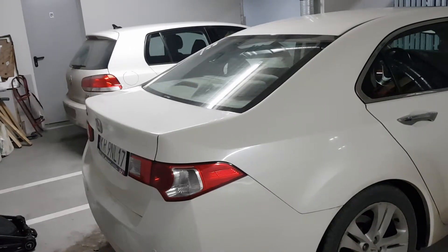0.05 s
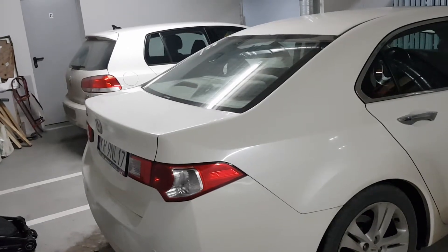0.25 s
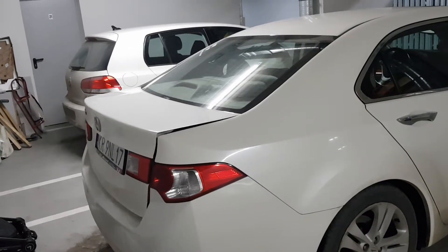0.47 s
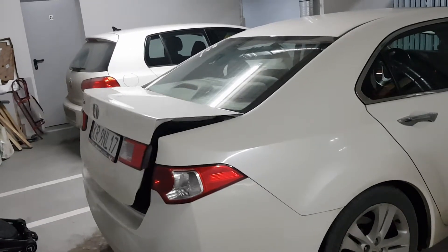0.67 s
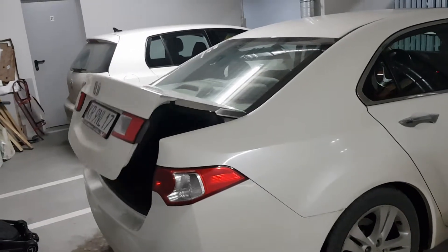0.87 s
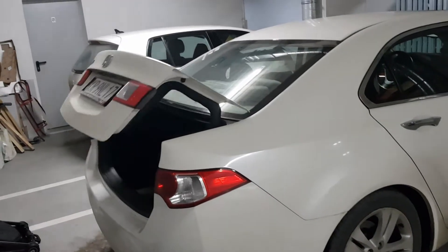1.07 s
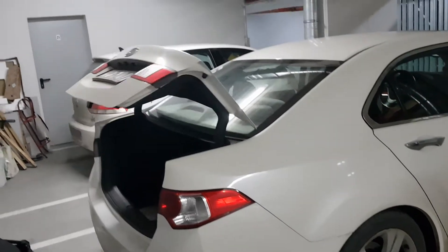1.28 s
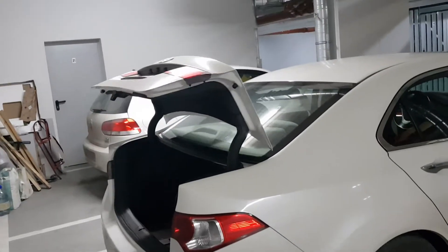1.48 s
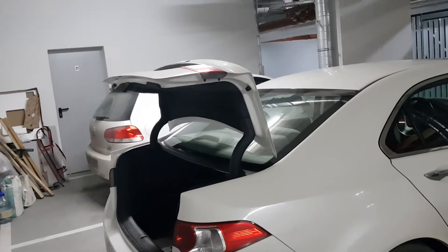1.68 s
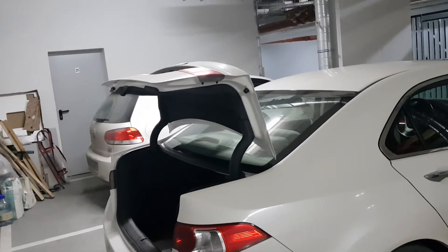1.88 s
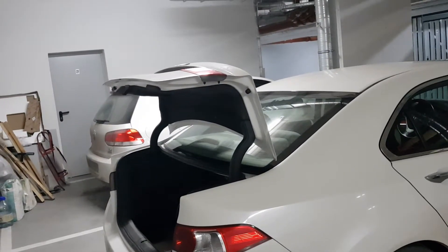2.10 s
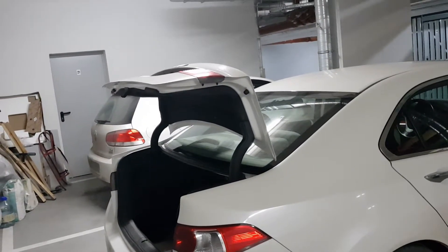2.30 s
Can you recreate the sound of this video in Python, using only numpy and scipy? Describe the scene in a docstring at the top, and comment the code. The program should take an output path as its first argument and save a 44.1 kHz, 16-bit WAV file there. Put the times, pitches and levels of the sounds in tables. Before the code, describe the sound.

A car trunk opens with a brief motor whirr, a thud and sharp clicks. The lid rises on faintly rubbing hinges and knocks against its stop, close by and slightly left, in a concrete garage with rumbling ventilation.

```python
"""Ventilation rumbles in a quiet concrete garage; then a car's trunk opens, a little left of the microphone.
The release motor whirrs, the latch lets go with a thud that rings the body, the lid clacks free
and a sharp click sounds close by. The lid swings up on rubbing hinges, knocks against its stop
and rebounds with a boom of sheet metal. A few soft steps follow; the concrete adds a short tail."""
import sys
import numpy as np
from scipy import signal
from scipy.io import wavfile

SR = 44100
rng = np.random.default_rng(int(sys.argv[2]) if len(sys.argv) > 2 else 0)


def transcribe(signal):
    """Save signal, clipped to [-1, 1], as a 16-bit WAV file at the path in sys.argv[1]."""
    frames = np.atleast_2d(signal).T
    limited = np.clip(frames, -1, 1)
    pcm = np.round(limited * 32767).astype(np.int16)
    wavfile.write(sys.argv[1], SR, pcm)


N = 108045
T = np.arange(N) / SR

# Colour of each struck part, and of the bright treble hiss: frequency_hz, relative_density_db
PAWL_COLOUR = [(500, -10.5), (900, 1.5), (1500, 2.5), (2100, 1), (3600, -5.5), (4800, -19), (8000, -28),
               (15000, -26)]
LATCH_COLOUR = [(35, -8.5), (100, -3), (240, 0.5), (300, -5.5), (600, -9), (1150, -13), (1400, -12),
                (2200, -10.5), (3400, -21.5), (8000, -34), (15000, -36.5)]
TREBLE_HISS_COLOUR = [(4000, -2.5), (8000, -8.5), (10500, 0.5), (15000, -3)]
CATCH_COLOUR = [(200, -31.5), (320, -8.5), (437, -24.5), (606, -16), (900, -19), (1470, -25.5),
                (3500, -26.5), (6300, -43.5), (15000, -40.5)]
STOP_COLOUR = [(400, -11.5), (640, 0), (800, -2), (1430, -8), (1950, -3), (2440, -11.5), (5280, -20),
               (7800, -32), (10000, -24.5), (15000, -37)]
REBOUND_COLOUR = [(240, -6.5), (400, 1), (550, -7), (1370, -4), (1910, -2), (4590, -8.5), (7720, -27),
                  (14000, -20)]
THUMP_COLOUR = [(120, -4.5), (250, 2), (450, -7), (800, -6), (1500, -21.5), (2200, -22), (3500, -23)]
# Blows that set them going: start_s, level_db, attack_s, t60_at_1khz_s
PAWL_HITS = [(.333, -58, 0.0046, 0.074), (.354, -50.5, .003, 0.18), (0.43, -38, 0.0029, 0.025),
             (0.4391, -30.5, 0.0007, 0.06), (0.581, -32, 0.0014, 0.06)]
LATCH_HITS = [(.431, -28.5, 0.0055, 0.15), (.451, -30, 0.0042, 0.24)]
TREBLE_HISS_HITS = [(0.449, -52, 0.0026, 0.67), (0.582, -39.5, .001, .025), (0.584, -57, .003, 0.36)]
CATCH_HITS = [(.582, -37.5, .003, .22)]
STOP_HITS = [(1.514, -44, 0.0037, 0.15), (1.519, -36, 0.0011, 0.32)]
REBOUND_HITS = [(1.749, -50, 0.004, 0.27)]
LID_THUMPS = [(1.231, -53.5, 0.0071, 0.47), (1.524, -45.5, 0.0164, 0.25)]
STEP_HITS = [(2.105, -57.5, 0.0046, 0.37), (2.195, -63.5, 0.0049, 0.17), (2.354, -59, 0.01955, 0.21)]
# Modes of the car body, freed lid, hinge arms and the lid's sheet metal: pitch_hz, level_db, t60_s
BODY_MODES = [(68.5, -24.5, .42), (126, -25, .25), (206, -25.5, .24), (332, -33.5, 0.3), (447, -43, .2),
              (562, -42, 0.17), (2210, -38, 0.083)]
LID_MODES = [(238.5, -29, 0.11), (633, -46.5, 0.14)]
ARM_MODES = [(542.6, -47.5, 0.36), (642.2, -41, 0.25), (757, -45, 0.21), (1174, -56, 0.41),
             (1243, -50.5, 0.31), (1900, -53.5, 0.33)]
SHEET_MODES = [(142.6, -49.5, 0.79), (268.7, -56, 0.27)]

# Impulses behind the sharp clicks and the faint ticks of the hinge springs: start_s, force_db
CLICK_TAPS = [(0.5847, -22.5), (0.6594, 0)]
SPRING_TAPS = [(.693, -18.5), (1.305, -26), (1.452, -24.5), (2.159, -32)]
# Resonances of the clicks: pitch_hz, width_hz, left_db, right_db
CLICK_RINGS = [(1105, 590, 5, 5.5), (2078, 411, 17, 15.5), (2650, 743, 9, 6.5), (3675, 848, 15, 8.5),
               (6590, 3300, -11.5, -0.5), (8800, 1469, 13, -9.5), (9930, 2100, 6.5, -1),
               (11600, 2900, 2, 3), (15200, 1000, -7, -14)]
# Colour of the loud click coming back off the walls: frequency_hz, relative_density_db
SCATTER_COLOUR = [(800, -13.5), (2200, -2), (3800, -0.5), (6500, -5.5), (8000, -11.5), (10000, -4.5),
                  (15000, -15.5)]
# Those early reflections: start_s, level_db, attack_s, t60_at_1khz_s
SCATTER_HITS = [(.661, -50.5, .002, 0.6)]

# Colour of the moving parts: frequency_hz, relative_density_db
MOTOR_COLOUR = [(190, 0.5), (400, -5), (600, -8), (1090, -10), (1620, -6.5), (2870, -18.5), (4300, -25),
                (5440, -31), (8200, -33.5), (10000, -24), (15000, -30.5)]
SWISH_COLOUR = [(3200, -10), (4300, 8), (6000, -6), (8000, -13), (14000, -5.5)]
HINGE_COLOUR = [(240, -26), (400, -3), (804, 2), (1370, -4), (1570, -14), (1910, -8), (5190, -4.5),
                (6510, -9), (7930, -16), (9960, -4.5), (15000, -16)]
# Envelope of each movement: attack_s, release_t60_s, level_db
MOTOR_RUN = (0.0065, .25, -48.5)
SWISH_RUN = (0.034, 0.42, -65.5)
HINGE_RUN = (0.048, 0.15, -62.5)
# When each part moves: start_s, end_s
MOTOR_SPAN, SWISH_SPAN, HINGE_SPAN = (.331, .425), (.855, .915), (1.224, 1.505)
# Whines of the motor: pitch_hz, width_hz, attack_s, level_db
MOTOR_WHINES = [(1645, 140, .006, -62), (3760, 280, .07, -63.5), (6900, 200, 0.039, -71.5)]
# Thin resonances of the rubbing hinges: pitch_hz, width_hz, level_db
HINGE_RINGS = [(6620, 420, -76), (1580, 130, -75.5), (776, 75, -72.5)]

# Colour of the garage's reverberation and of the ventilation: frequency_hz, relative_density_db
ROOM_COLOUR = [(60, -5), (300, -6), (1000, -10), (3000, 3.5), (6000, 5.5), (9000, -1), (15000, -11)]
AIR_COLOUR = [(25, -13.5), (50, -4), (95, -12.5), (120, -13.5), (200, -18.5), (310, -28), (500, -42.5),
              (1100, -48), (2600, -45.5), (5500, -55), (6800, -54.5), (7400, -67), (8400, -71),
              (12000, -42.5), (16000, -48)]
# Low standing waves that the ventilation keeps ringing: pitch_hz, width_hz, level_db
STANDING_WAVES = [(67.3, 14, -50.5), (84.5, 15, -49)]
# Likeness of diffuse sound on the two sides of the microphone: frequency_hz, correlation
STEREO_LIKENESS = [(60, 1), (300, 0.87), (700, 0.33), (1400, -0.06), (4000, -.1), (12000, -0.098)]


def latch():
    """The steel pawl clacks, the latch lets go with a thud, and the lid clacks off the catch."""
    release = blows(PAWL_COLOUR, PAWL_HITS) + blows(LATCH_COLOUR, LATCH_HITS)
    # the seal unsticking, then the catch's sharp click and high ring
    treble_hiss = blows(TREBLE_HISS_COLOUR, TREBLE_HISS_HITS)
    return release + treble_hiss + blows(CATCH_COLOUR, CATCH_HITS)


def panels():
    """The body rings at the latch; the lid's note sinks as its strain goes, and it booms on the rebound."""
    body = modes(BODY_MODES, start_s=.4345)
    freed_lid = modes(LID_MODES, start_s=.5915, sharp_share=.43)
    return body + freed_lid + modes(SHEET_MODES, start_s=1.757)


def clicks():
    """Hard contacts ring briefly near the microphone, springs tick, the loud click scatters off walls."""
    chatter = [(start_s + .0007, db - 14.5) for start_s, db in CLICK_TAPS]   # each contact bounces once
    force = taps(CLICK_TAPS) + taps(chatter)
    snaps = sum((-1) ** k * from_db([[left_db], [right_db]]) * resonate_twice(force, hz, width_hz)
                for k, (hz, width_hz, left_db, right_db) in enumerate(CLICK_RINGS))
    spring_ticks = resonate_twice(taps(SPRING_TAPS), hz=4110, width_hz=2200)
    return snaps + spring_ticks + blows(SCATTER_COLOUR, SCATTER_HITS)


def release_motor(tooth_hz=176, roughness=.4, sag_db_per_s=50.5, spin_up_s=.032):
    """Whining gears brighten as the motor spins up, pulse at the tooth rate and sag under load."""
    def spin_up(t, hz):
        """The 6 kHz region takes spin_up_s to come in; higher bands take longer."""
        return np.clip((t - MOTOR_SPAN[0]) / (spin_up_s * hz / 6000), 0, 1)

    gears = gate(MOTOR_SPAN, *MOTOR_RUN) * banded_noise(MOTOR_COLOUR, spin_up)
    teeth = 1 + roughness * np.sin(2 * np.pi * tooth_hz * T)
    sag = from_db(-sag_db_per_s * (T - MOTOR_SPAN[0]))
    whines = sum(narrow_noise(hz, width_hz) * gate(MOTOR_SPAN, attack_s, t60_s=.1, db=db)
                 for hz, width_hz, attack_s, db in MOTOR_WHINES)
    return gears * teeth * sag + whines


def lid_swing():
    """The lid swishes and thumps up on rubbing hinges, hits its stop, rings the arms and rebounds."""
    swish = gate(SWISH_SPAN, *SWISH_RUN) * banded_noise(SWISH_COLOUR)
    thumps = blows(THUMP_COLOUR, LID_THUMPS)
    friction = gate(HINGE_SPAN, *HINGE_RUN) * banded_noise(HINGE_COLOUR)
    rings = sum(narrow_noise(hz, width_hz) * gate(HINGE_SPAN, *HINGE_RUN[:2], db)
                for hz, width_hz, db in HINGE_RINGS)
    stop = blows(STOP_COLOUR, STOP_HITS) + modes(ARM_MODES, start_s=1.521)
    return swish + thumps + friction + rings + stop + blows(REBOUND_COLOUR, REBOUND_HITS)


def footsteps():
    """Soft, dull footfalls on the garage floor."""
    return blows(THUMP_COLOUR, STEP_HITS)


def garage(sound):
    """Diffuse reverberation that comes back to the microphone off the concrete."""
    tail = dense_ring(ROOM_COLOUR, attack_s=.0083, t60_at_1khz_s=.59)
    tail /= np.sqrt(np.sum(tail ** 2) / 2)   # unit energy a side
    return signal.fftconvolve(sound.mean(axis=0, keepdims=True), tail, axes=1)[:, :N]


def ventilation(air_db=-53):
    """The room tone: steady air noise over throbbing low standing waves."""
    rumble = 0
    for hz, width_hz, db in STANDING_WAVES:
        wave = resonate_twice(rng.standard_normal(N + SR), hz, width_hz)[SR:]   # already ringing
        rumble += from_db(db) * rms_one(wave)
    return from_db(air_db) * banded_noise(AIR_COLOUR) + rumble


def blows(colour, hits):
    """Each blow sets the dense ring of one part going."""
    return sum(from_db(db) * placed(dense_ring(colour, attack_s, t60_s), start_s)
               for start_s, db, attack_s, t60_s in hits)


def dense_ring(colour, attack_s, t60_at_1khz_s, knee_hz=606, slope=.21):
    """Countless close modes that swell and die; above the knee, the higher the sooner."""
    def envelope(t, hz):
        t60_s = t60_at_1khz_s * (1000 / max(hz, knee_hz)) ** slope
        return np.minimum(t / attack_s, 1) * decay(t - attack_s, t60_s)

    return banded_noise(colour, envelope, size=SR)


def modes(table, start_s, sharp_share=0, settle_s=.011):
    """The strong single modes of a struck part; a strained part starts sharp and settles."""
    t = np.maximum(T - start_s, 0)
    bent_time = t + sharp_share * settle_s * (1 - np.exp(-t / settle_s))
    return -sum((-1) ** k * from_db(db) * np.sin(2 * np.pi * hz * bent_time) * decay(t, t60_s)
                for k, (hz, db, t60_s) in enumerate(table))


def taps(rows, lead_s=.00032):
    """Single impulses that reach the right side of the microphone first."""
    force = np.zeros((2, N))
    for start_s, db in rows:
        force[0, int(start_s * SR)] = force[1, int((start_s - lead_s) * SR)] = from_db(db)
    return force


def banded_noise(colour, envelope=lambda t, hz: 1, size=N):
    """Third-octave stereo noise of rms 1, each band then shaped by envelope(t, hz)."""
    edges_hz = 22 * 2 ** (np.arange(30) / 3)
    t = np.arange(size) / SR
    white = rng.standard_normal((2, 2, size + SR // 4))
    noise, power = 0, 0
    for k, (low, high) in enumerate(zip(edges_hz, edges_hz[1:])):
        if high < colour[0][0] or low > colour[-1][0]:
            continue
        hz = np.sqrt(low * high)
        band = signal.butter(2, [low, high], "band", fs=SR, output="sos")
        mid, side = rms_one(signal.sosfilt(band, white[k % 2])[:, -size:])
        likeness = at_hz(STEREO_LIKENESS, hz)
        stereo = np.sqrt(1 + likeness) * mid + np.sqrt(1 - likeness) * side * [[1], [-1]]
        gain = from_db(at_hz(colour, hz)) * np.sqrt(high - low)
        noise += gain * envelope(t, hz) * stereo
        power += 2 * gain ** 2
    return noise / np.sqrt(power)


def narrow_noise(hz, width_hz):
    """Stereo noise of rms 1 around one pitch."""
    return rms_one(resonate_twice(rng.standard_normal((2, N)), hz, width_hz))


def resonate_twice(x, hz, width_hz):
    """Twice through a two-pole resonance: gain 1 on top, dark valleys beside it."""
    radius = np.exp(-np.pi * width_hz / SR)
    feedforward = np.array([1, 0, -1]) * (1 - radius ** 2) / 2
    feedback = [1, -2 * radius * np.cos(2 * np.pi * hz / SR), radius ** 2]
    for _ in range(2):
        x = signal.lfilter(feedforward, feedback, x + 1e-18)
    return x


def gate(span, attack_s, t60_s, db):
    """Attack, hold and release of a movement."""
    start_s, end_s = span
    return from_db(db) * np.clip((T - start_s) / attack_s, 0, 1) * decay(T - end_s, t60_s)


def decay(t, t60_s):
    """Exponential decay from t = 0."""
    return np.exp(-np.log(1000) * np.maximum(t, 0) / t60_s)


def placed(x, start_s):
    """A sound set into the timeline at its start."""
    return np.pad(x, ((0, 0), (int(start_s * SR), N)))[:, :N]


def to_left(x, db):
    """Raise the left side and lower the right, each by db."""
    return x * from_db([[db], [-db]])


def at_hz(table, hz):
    """Read a table on a log-frequency axis."""
    frequencies, values = np.array(table).T
    return np.interp(np.log(hz), np.log(frequencies), values)


def from_db(db):
    """Decibels to gain."""
    return 10 ** (np.asarray(db) / 20)


def rms_one(x):
    """Scale to unit rms."""
    return x / np.sqrt(np.mean(x ** 2) + 1e-20)


def scene(reverb_db=-8.5):
    """Trunk and steps a little left of the microphone, the panels' modes centred, the garage all round."""
    direct = to_left(release_motor() + latch() + lid_swing() + footsteps(), db=2.5) + panels()
    return direct + clicks() + from_db(reverb_db) * garage(direct) + to_left(ventilation(), db=1.1)


def record(dry, fade_in_s=.01, cutoff_hz=16000):
    """The sound fades in quickly and the top is cut steeply."""
    low_pass = signal.ellip(10, .2, 80, cutoff_hz, fs=SR, output="sos")
    return signal.sosfilt(low_pass, dry * np.minimum(T / fade_in_s, 1))


dry = scene()
out = record(dry)
transcribe(out)
```